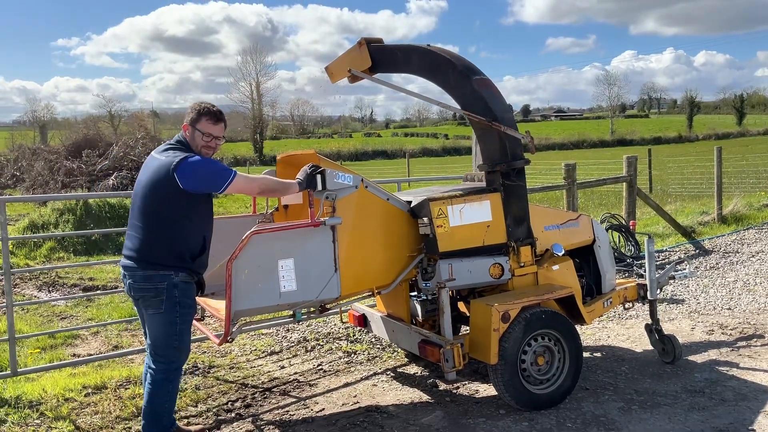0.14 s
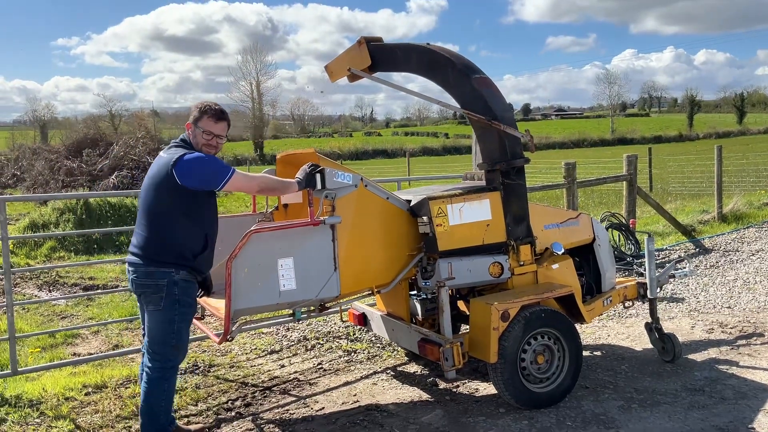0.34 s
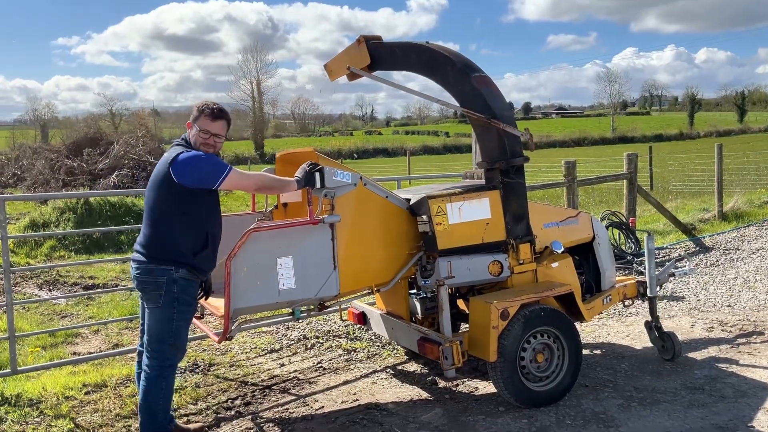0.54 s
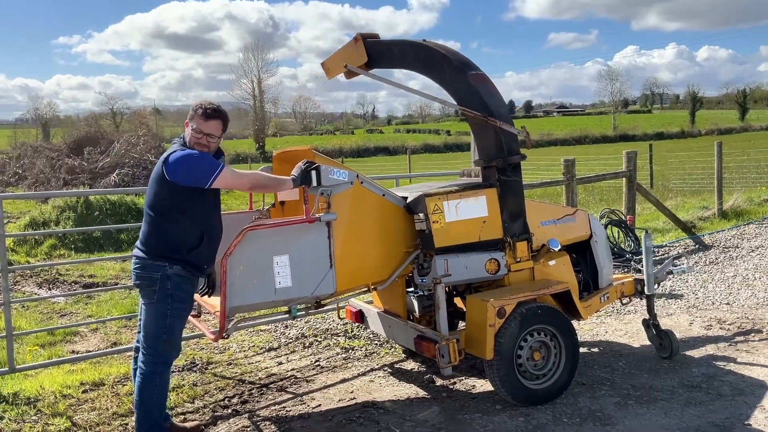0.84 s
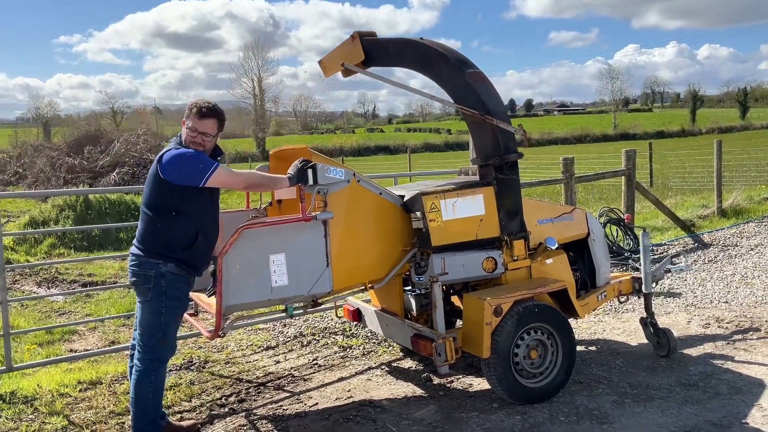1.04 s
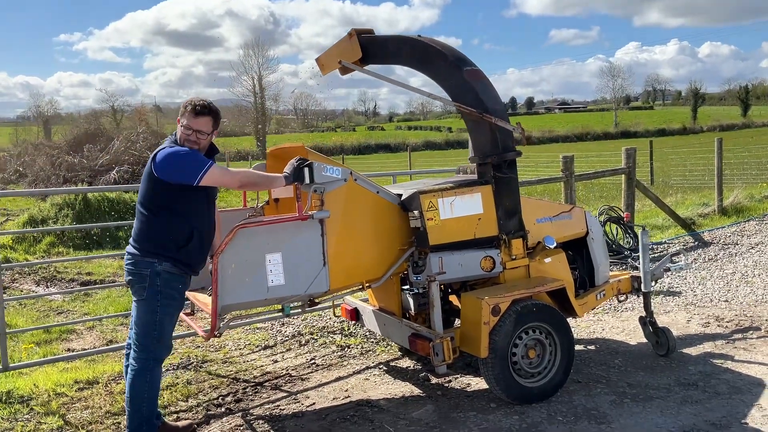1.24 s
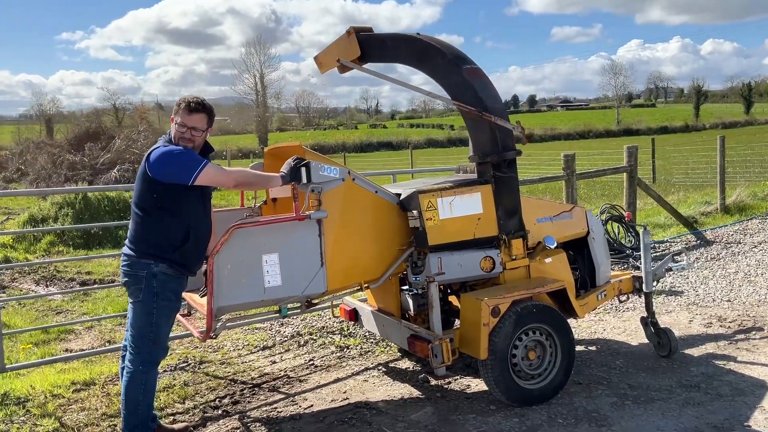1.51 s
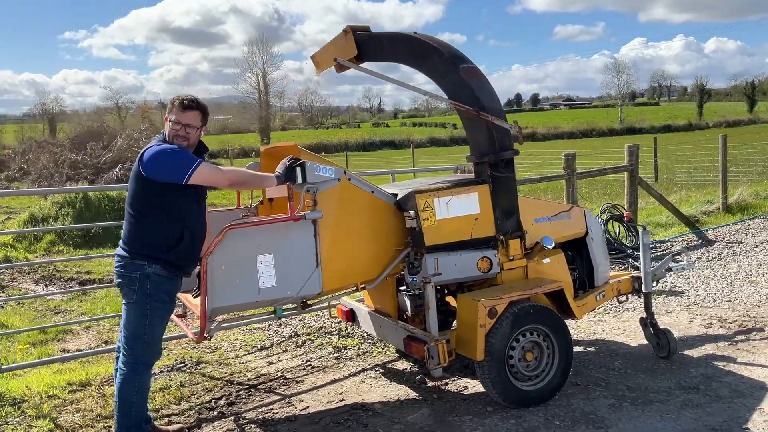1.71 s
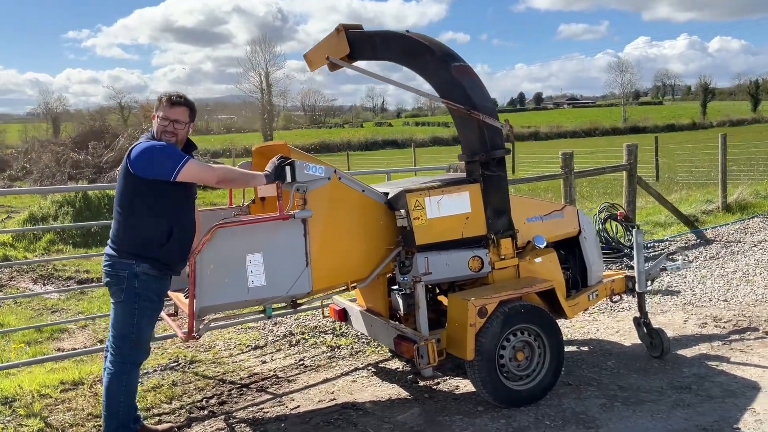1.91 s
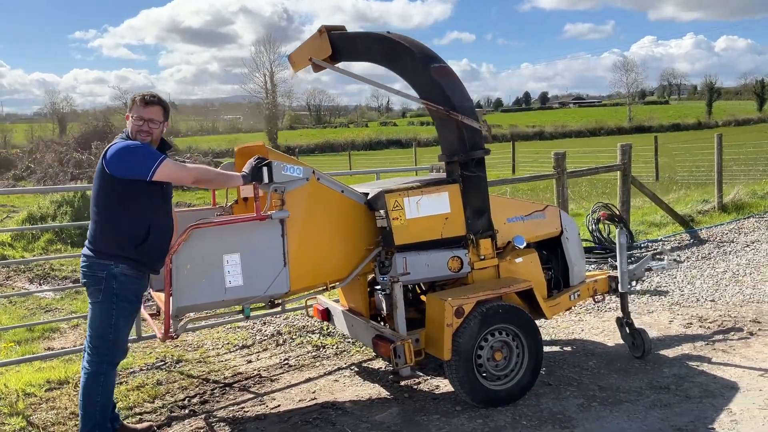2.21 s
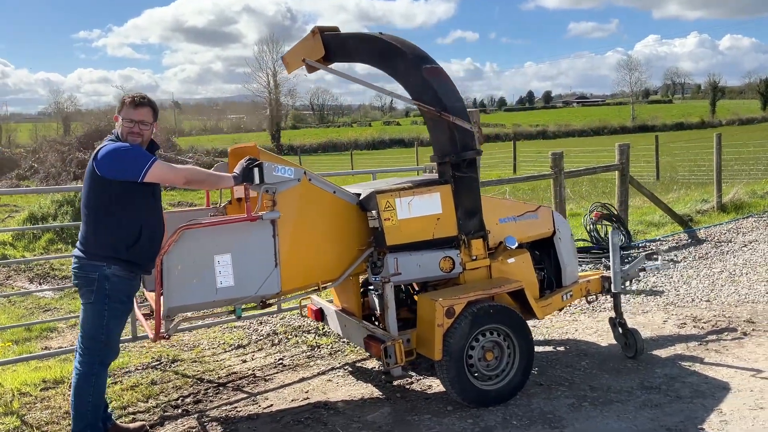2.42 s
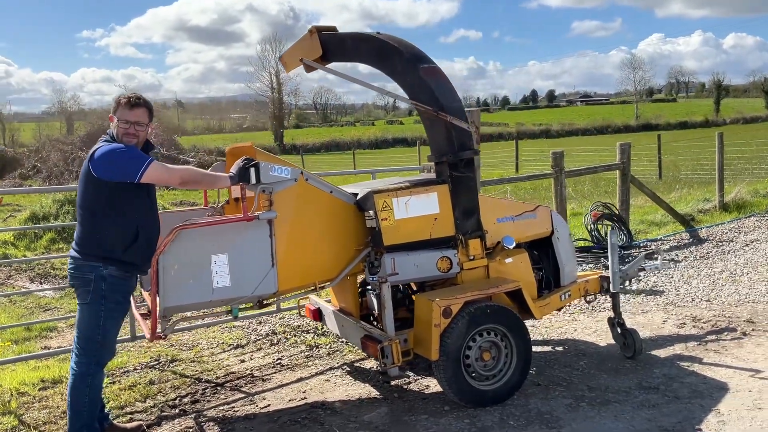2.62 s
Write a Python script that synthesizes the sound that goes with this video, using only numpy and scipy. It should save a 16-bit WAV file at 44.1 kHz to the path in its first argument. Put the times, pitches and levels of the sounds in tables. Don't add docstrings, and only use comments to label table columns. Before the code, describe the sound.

A towable wood chipper runs without load in an open yard, a few metres from a phone: steady throbbing engine, low rotor hum, hissing air and constant steel rattle, with irregular hard clacks and knocks.

```python
import sys
import numpy as np
from scipy import signal
from scipy.fft import rfft, irfft
from scipy.io import wavfile
from scipy.ndimage import uniform_filter1d

SR = 44100
rng = np.random.default_rng(int(sys.argv[2]) if len(sys.argv) > 2 else 0)


def wrap_up_sound(samples):
    columns = np.atleast_2d(samples).T
    tamed = np.clip(columns, -1, 1)
    steps = np.round(tamed * 32767).astype(np.int16)
    wavfile.write(sys.argv[1], SR, steps)


def ratio(d):
    e = np.asarray(d, float) / 20
    return 10 ** e


N = 121716

# (time [s], rotation rate [turns/s])
ROTOR_SPEED = [(0, 24.722), (.6, 24.738), (1.0, 24.752), (1.4, 24.80), (1.7, 24.72), (2.1, 24.66),
               (2.4, 24.64), (2.76, 24.72)]
# (time [s], clatter level [dB])
SURGES = [(0.0, -34.5), (.15, -35.5), (.3, -33.5), (0.405, -35), (0.46, -29), (0.6, -28), (.7, -28),
          (.83, -30.5), (1.21, -33), (1.4, -31.5), (1.61, -29), (1.75, -31), (2.0, -32), (2.27, -31),
          (2.44, -34.5), (2.5, -37.5), (2.7, -39.5), (2.76, -41.5)]
SURGE_REF_DB = -31


def level(x, db):
    return x * ratio(db) / np.sqrt(np.mean(x ** 2))


def curve(rows, at):
    return np.interp(at, *np.array(rows, float).T[:2])


def logcurve(rows):
    r = np.array(rows, float)
    hz = np.arange(N // 2 + 1) * SR / N
    return np.interp(np.log(hz + 1), np.log(r[:, 0]), r[:, 1])


def colour(x, rows):
    return irfft(rfft(x) * ratio(logcurve(rows)), N)


def band(x, hz, width_hz):
    return signal.lfilter(*signal.iirpeak(hz, hz / width_hz, SR), x)


def walk(rate):
    k = int(SR / rate)
    held = np.repeat(rng.standard_normal(N // k + 1), k)
    return 1.27 * uniform_filter1d(uniform_filter1d(held, k), k)[:N]


def noise():
    return rng.standard_normal((2, N))


def beats(turns, scatter_db):
    out = np.zeros(N)
    at = np.flatnonzero(np.diff(np.floor(turns)) > 0)
    out[at] = ratio(scatter_db * rng.standard_normal(len(at)))
    return out


def tones(turns, rows, wobble_db, jitter):
    out = np.zeros(N)
    for order, db in rows:
        swell = ratio(db + wobble_db * np.sqrt(order) * walk(9.05))
        out += np.sqrt(2) * swell * np.cos(2 * np.pi * order * (turns + jitter * walk(13)))
    return out


def flicker(x, depth_db, rate):
    out, octave = 0, np.log2(np.arange(N // 2 + 1) * SR / N + 1)
    spectrum, last = rfft(x), walk(rate)
    for centre in np.arange(5, 15, .5):
        new = walk(rate)
        window = np.clip(1 - 2 * abs(octave - centre), 0, 1)
        out = out + irfft(spectrum * window, N) * ratio(depth_db * (new + last))
        last = new
    return out


def steel(x):
    mode_count, q, gain = 160, 160, .75
    f = np.arange(N // 2 + 1) * SR / N
    coarse = f[::8]
    draw = rng.random((mode_count, 2))
    mode_hz, weight = 900 * 15 ** draw[:, 0], 2 * draw[:, 1] - .7
    modes = sum(w / (1 + 2j * q * (coarse / hz - 1)) for hz, w in zip(mode_hz, weight))
    return irfft(rfft(x) * (1 + gain * np.interp(f, coarse, modes)), N)


def engine(t, turns):
    # (order [crank turns], level [dB])
    exhaust = [(2, -25.5), (3, -36.5), (6, -48.5), (13, -51.5), (24, -54)]
    # (frequency [Hz], density [dB])
    roar_shape = [(25, -35), (50, -4), (100, 1), (280, -2), (350, -6.5), (650, -5), (1100, -10.5),
                  (3000, -25.5)]
    pipe_hz, pipe_width_hz = 850, 1030
    pipe = band(band(beats(turns, 1.7), pipe_hz, pipe_width_hz), pipe_hz, pipe_width_hz)
    puff = 1 + 0.072 * np.exp(-(turns % 1) / 0.4)
    roar = level(flicker(colour(noise() * puff, roar_shape), 1.0, 7.9), -26.5)
    roar = roar * ratio(0.27 * (curve(SURGES, t) - SURGE_REF_DB))
    return tones(turns, exhaust, 0.34, 0.0086) + level(pipe, -39.5) + roar


def rotor(t, turns):
    # (order [rotor turns], level [dB])
    paddles = [(3, -34.5), (6, -22.5), (8, -43.5), (9, -29.5), (12, -41), (15, -49.5)]
    # (time [s], swell of the lower paddle tones [dB])
    air_load = [(0, -0.5), (1.4, -0.5), (2.25, 2.5), (2.76, 2.5)]
    # (frequency [Hz], width [Hz], level [dB])
    chute_modes = [(619, 62, 1.5), (697.3, 22, 4), (757.4, 51, -2.5)]
    # (time [s], swell of the chute air column [dB])
    draught = [(0, -0.5), (.45, 0.5), (.7, 1.5), (1.0, -0.5), (1.3, 0.5), (1.55, -1), (1.75, 2.5),
               (2.1, -0.5), (2.76, -2.5)]
    housing_hz = 190
    slap = beats(turns, 0.68)
    gust = noise() * (1 + 0.65 * np.exp(-(3 * turns % 1) / 0.33))
    ring, air = 0, 0
    for hz, width, db in chute_modes:
        ring = ring + ratio(db) * band(band(slap, hz, width), hz, width)
        air = air + ratio(db) * band(band(gust, hz, 2 * width), hz, 2 * width)
    chute = (level(ring, -35.5) + level(air, -38)) * ratio(curve(draught, t))
    start_hz = ROTOR_SPEED[0][1]
    below = [row for row in paddles if row[0] * start_hz <= housing_hz]
    above = [row for row in paddles if row[0] * start_hz > housing_hz]
    low = tones(turns, below, 0.27, 0.0041) * ratio(curve(air_load, t))
    return low - tones(turns, above, 0.27, 0.0041) + chute


def clatter(t, turns):
    # (frequency [Hz], density [dB])
    clatter_shape = [(250, -9), (800, -1), (1200, -2), (2200, -1.5), (2600, -4), (5000, -9), (9000, -14.5),
                     (16000, -16)]
    shake_t_s, shake_depth = .007, .9
    shake_decay = np.exp(-np.arange(2000) / SR / shake_t_s)
    shake = np.convolve(beats(turns, 2.2), shake_decay)[:N]
    tick_size = ratio(2.5 * np.minimum(rng.exponential(size=N), 2.5))
    ticks = (rng.random(N) < 700 / SR) * tick_size
    grit = signal.lfilter([1], [1, -np.exp(-1 / (0.0016 * SR))], ticks)
    shaken = noise() * (1 + 0.15 * grit) * (1 + shake_depth * shake)
    body = level(steel(colour(shaken, clatter_shape)), -26)
    surge = ratio(curve(SURGES, t) - SURGE_REF_DB)
    fan = colour(colour(noise(), clatter_shape), [(2500, 0), (8000, -11)])
    return flicker(body, 1.0, 10.82) * surge + level(fan, -41.5)


def thuds(t, hiss):
    # (time [s], level [dB], rise [s], fall [s], centre frequency [Hz])
    dull_blows = [(0.54, -29.5, 0.028, 0.074, 340), (.77, -28, 0.025, 0.036, 400),
                  (1.55, -29.5, 0.032, 0.032, 400), (1.73, -24.5, 0.035, 0.087, 336),
                  (1.93, -32, 0.068, 0.26, 350), (2.15, -30.5, .06, 0.064, 434),
                  (0.676, -32, 0.049, 0.11, 710), (1.1, -35, .06, 0.076, 670),
                  (1.43, -24, 0.012, 0.089, 2040), (0.715, -32, .05, .08, 4200), (.56, -33, .07, .12, 1500),
                  (.33, -37, .06, .06, 2000), (2.16, -36, .05, .06, 1900)]
    out = np.zeros((2, N))
    for s, db, rise, fall, hz in dull_blows:
        env = np.exp(-np.where(t < s, ((s - t) / rise) ** 2, (t - s) / fall))
        out += env * level(band(band(hiss[::-1], hz, hz / 2), hz, hz), db)
    return out


def panels(t):
    # (time [s], level [dB], frequency [Hz], t60 [s])
    struck = [
        (.024, -28.5, 592, 0.66),
        (.024, -37, 3709, .3),
        (0.037, -41, 890, .15),
        (.12, -37, 830, .3),
        (1.437, -30.5, 2207, 0.32),
        (1.51, -37, 2207, 0.34),
        (.47, -33, 1000, 0.35),
        (2.021, -40, 5400, .3),
        (0.024, -30, 6700, 0.04),
    ]
    out = np.zeros(N)
    for s, db, hz, t60 in struck:
        u = np.maximum(t - s, 0)
        decay = ratio(db + 8 - 60 * u / t60 + 1.3 * walk(35.6))
        out += decay * (1 - np.exp(-u / 0.0024)) * np.sin(2 * np.pi * hz * u)
    return out


def strikes(t, rows, rattle, gain_db, t60):
    out = np.zeros((2, N))
    for s, db in rows:
        a = int(s * SR)
        u = t[a:a + 5000] - s
        env = ratio(db + gain_db - 60 * u / t60) * (1 - np.exp(-u / 0.0009))
        out[:, a:a + 5000] += env * rattle[:, a:a + 5000]
    return out


def taps(t, broad):
    # (time [s], level [dB])
    light_blows = [(.1955, -24), (.2264, -22), (.2638, -21), (.3117, -22), (.3586, -20), (.6674, -20),
                   (.7098, -21), (.7806, -17), (.8749, -14), (.9233, -20), (.9931, -15), (1.0405, -28),
                   (1.0869, -21), (1.1323, -16), (1.1792, -13), (1.2331, -21), (1.8282, -23), (2.5721, -28),
                   (2.596, -27), (2.7157, -27)]
    return strikes(t, light_blows, broad, -12, .08)


def cracks(t, hiss):
    # (time [s], level [dB])
    hard_blows = [(.023, -28), (.287, -29), (.4165, -15), (.455, -9), (.944, -21), (1.015, -19),
                  (1.273, -16), (1.370, -15), (1.437, -19), (2.0205, -5), (2.1, -12), (2.221, -6),
                  (2.407, -18)]
    # (frequency [Hz], density [dB])
    crack_shape = [(1000, -18), (4000, -18), (9000, 5), (16000, 3)]
    return strikes(t, hard_blows, level(colour(hiss, crack_shape), 0), -16.5, 0.087)


def knocks(t, broad, hiss):
    # (time [s], peak level [dB], ring frequency [Hz], t60 [s])
    blows = [(0.021, -14.5, 3770, 0.39), (0.028, -21, 5800, .4), (0.286, -16, 4270, 0.1),
             (0.3356, -19.5, 3410, 0.11), (0.415, -12.5, 3840, 0.15), (0.454, -8, 5600, 0.15),
             (0.4774, -13.5, 3700, 0.24), (0.5935, -33, 3980, 0.22), (0.6399, -23, 3910, 0.2),
             (0.6883, -18.5, 4200, 0.16), (0.7577, -12, 4660, 0.074), (0.854, -18.5, 5700, 0.34),
             (0.943, -14.5, 4160, 0.15), (1.014, -17, 6100, 0.46), (1.1104, -19, 3800, 0.41),
             (1.1894, -21, 5730, 0.16), (1.272, -16, 6300, 0.31), (1.3703, -14.5, 5600, 0.22),
             (1.4371, -17, 4380, 0.43), (1.5075, -18, 5360, 0.17), (1.6262, -18.5, 3900, 0.53),
             (2.0206, -9, 5740, 0.29), (2.0994, -20, 3970, 0.14), (2.1475, -18.5, 3280, 0.21),
             (2.2205, -12.5, 6000, 0.25), (2.318, -19.5, 6300, 0.31), (2.407, -17.5, 4940, 0.32)]
    out = np.zeros((2, N))
    for s, db, hz, t60 in blows:
        a = int(s * SR)
        u = t[a:a + 9000] - s
        env = (1 - np.exp(-u / 0.002)) * ratio(-60 * u / max(t60, .03))
        ring = level(band(hiss[:, a:a + 9000], hz, hz / 6), -5.5)
        out[:, a:a + 9000] += ratio(db - 11) * env * (broad[:, a:a + 9000] + ring)
    return out


def impacts(t):
    # (frequency [Hz], density [dB])
    rattle_shape = [(400, -7), (1500, 5.5), (3500, 3.5), (5800, -2.5), (9500, -5.5), (16000, -6.5)]
    hiss = noise()
    broad = level(steel(colour(hiss, rattle_shape)), 0)
    return thuds(t, hiss) + panels(t) + taps(t, broad) + cracks(t, hiss) + knocks(t, broad, hiss)


def scene():
    belt_ratio, engine_start_turn, rotor_start_turn = 1.7195, -.235, -.053
    t = np.arange(N) / SR
    turns = np.cumsum(curve(ROTOR_SPEED, t)) / SR
    crank = belt_ratio * turns + engine_start_turn
    return engine(t, crank) + rotor(t, turns + rotor_start_turn) + clatter(t, crank) + impacts(t)


def band_limit(x):
    return signal.sosfilt(signal.butter(12, 16790, fs=SR, output="sos"), x)


def record(dry):
    # (frequency [Hz], gain [dB])
    mic = [(20, -13), (60, 0.5), (4800, 0), (6000, 5), (7200, -2.5), (9500, -2), (11700, -13), (15700, -10)]
    # (frequency [Hz], lag [rad])
    lag = [(0, 0), (900, 1.8), (1400, .6), (2000, 1.8), (2600, 3.0), (2860, 3.28), (4100, 6.283),
           (22050, 6.283)]
    # (frequency [Hz], coherence [0-1])
    alike_base = [(60, .98), (800, .9), (1000, .3), (1650, .45), (2100, .85), (2610, .9995), (2860, .9995),
                  (3200, .88)]
    # (frequency [Hz], factor [1])
    alike_top = [(3300, 1), (4500, 1.14), (5300, .97), (6400, .81), (7500, .86), (7700, 1.16),
                 (13600, 1.16), (14000, 1.12)]
    # (frequency [Hz], gain [dB])
    left_shade = [(150, -2.9), (820, -.6), (1000, -8), (1600, -5.5), (2500, 0), (4800, 0), (5900, -7),
                  (7600, 0)]
    # (time [s], share [0-1])
    hand_sway = [(0, .05), (.09, .25), (.15, 0), (.28, .6), (.34, 0), (.43, 0), (.46, .7), (.59, .5),
                 (.64, .03), (1.56, 0), (1.62, .45), (1.82, .45), (1.86, .03), (2.17, .05), (2.22, .5),
                 (2.27, .05), (2.48, 0), (2.54, .4)]
    top_hz, sway_hz, sway_depth, tremor_rad = 15850, 2720, 1.1, .035
    f = np.arange(N // 2 + 1) * SR / N
    a, b = rfft(dry) * ratio(logcurve(mic)) * (f < top_hz)
    alike = np.minimum(logcurve(alike_base) * logcurve(alike_top), .9995)
    mixed = alike * a + np.sqrt(1 - alike ** 2) * b
    left = ratio(logcurve(left_shade)) * np.exp(-1j * curve(lag, f)) * mixed
    sway = sway_depth * curve(hand_sway, np.arange(N) / SR) * band(irfft(b, N), sway_hz, 500)
    tremor = tremor_rad * walk(14) * band(irfft(1j * a, N), sway_hz, 700)
    ports = np.array([irfft(left, N) + sway + tremor, irfft(a, N)])
    return band_limit(ports)


dry = scene()
out = record(dry)
wrap_up_sound(out)
```